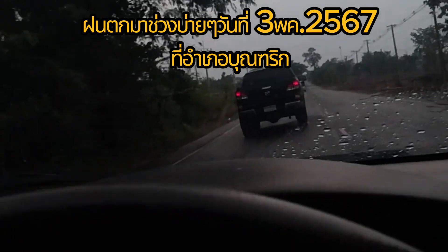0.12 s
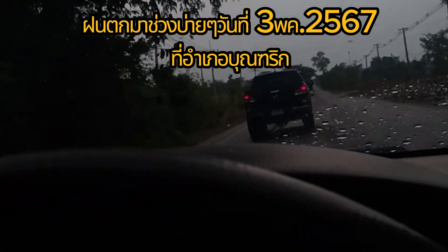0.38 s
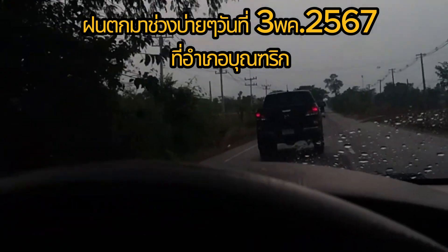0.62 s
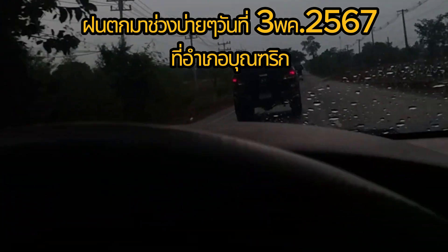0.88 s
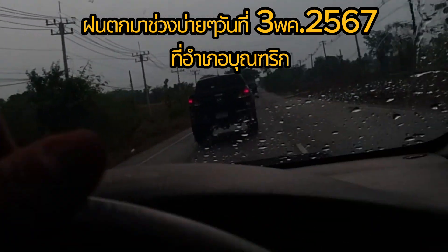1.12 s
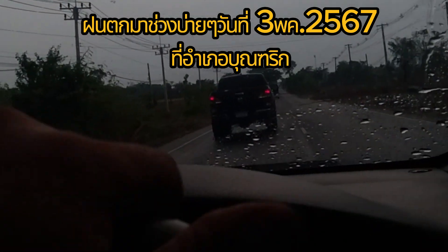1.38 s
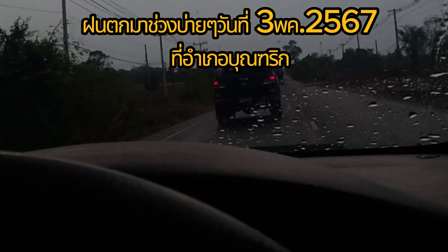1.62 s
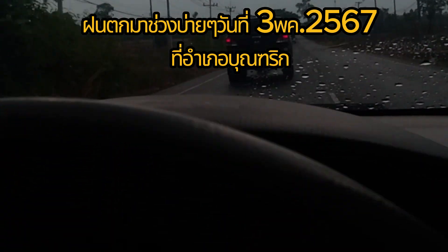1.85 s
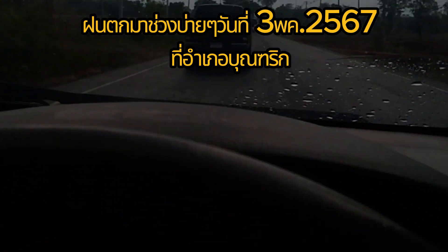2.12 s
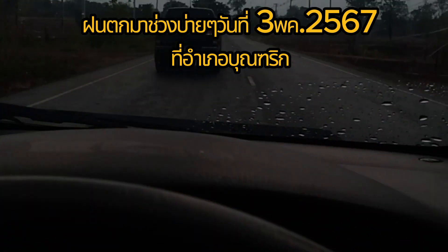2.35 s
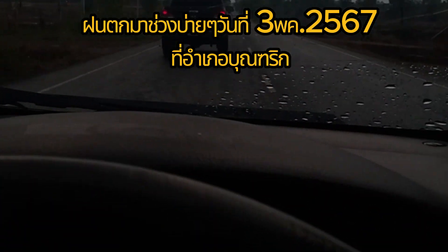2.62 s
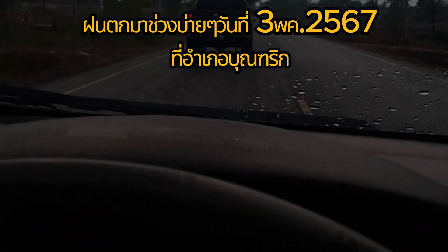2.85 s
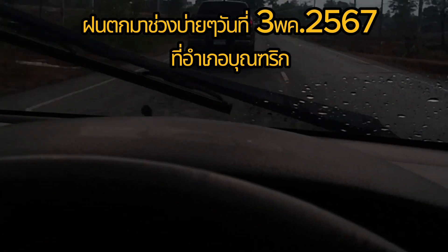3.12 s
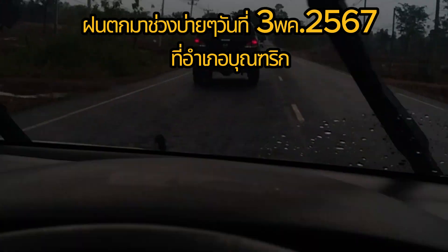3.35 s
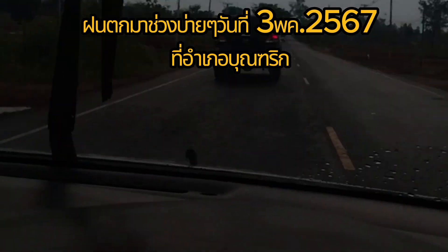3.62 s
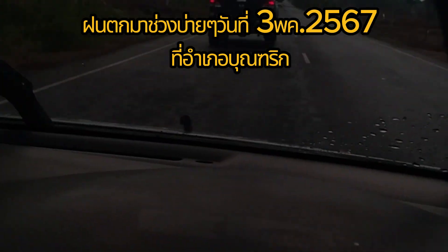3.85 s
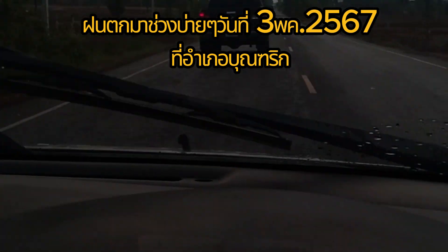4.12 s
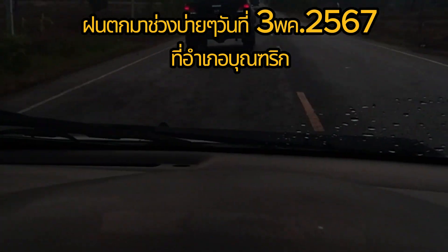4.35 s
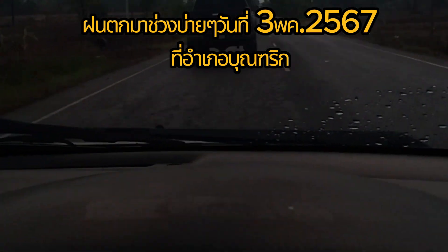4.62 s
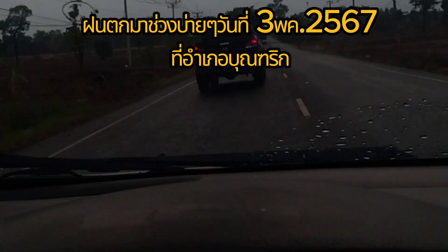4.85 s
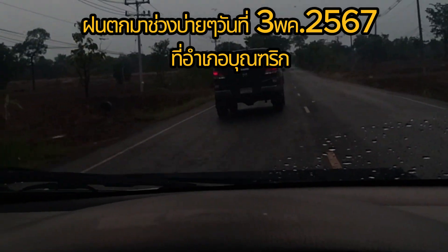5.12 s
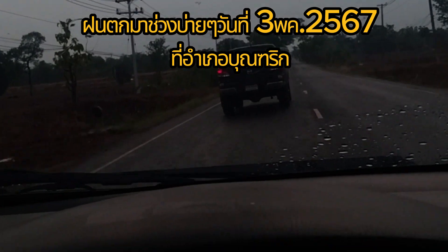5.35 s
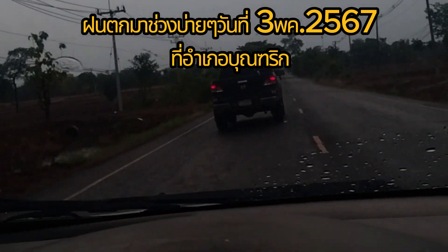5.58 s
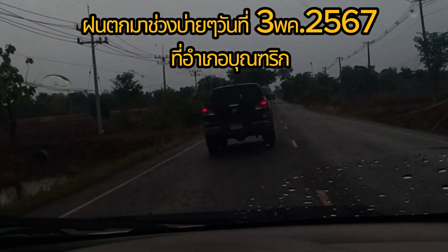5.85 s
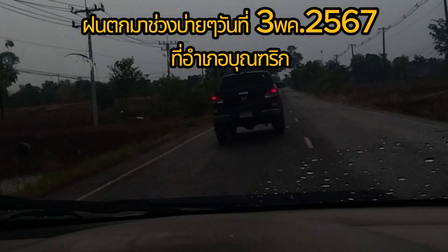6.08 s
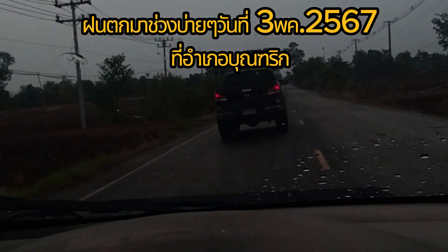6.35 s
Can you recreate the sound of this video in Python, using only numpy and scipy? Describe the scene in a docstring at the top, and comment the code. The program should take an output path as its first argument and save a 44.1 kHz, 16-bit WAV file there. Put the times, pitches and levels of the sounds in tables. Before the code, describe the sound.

Close inside a car cabin on a wet road, deep tyre rumble and a low engine hum run throughout. A few raindrops tap the glass, then thicken into a cluster past two seconds. Midway the wiper blade chatters with a faint squeak and low groan. Drops continue more densely while the engine eases and the rumble softens.

```python
"""Inside a car on a wet road: tyre rumble, a booming body and an engine that gains speed as its load eases off.
Scattered raindrops tap the windscreen and roof; the wiper blade chatters on its way down; the trim ticks.
Road is shaped noise, boom and engine are wavering sines, taps are ticks with noise tails filtered by the glass,
the wiper is a train of slips ringing its arm.
Two microphone ports hear the bass alike and the treble each in its own colour."""
import sys
import numpy as np
from scipy import signal
from scipy.fft import rfft, irfft, next_fast_len
from scipy.io import wavfile
from scipy.ndimage import uniform_filter1d

SR = 44100
rng = np.random.default_rng(int(sys.argv[2]) if len(sys.argv) > 2 else 0)


def volts_from_decibels(level):
    """Turn decibel levels (scalar or array-like) into linear amplitude factors."""
    exponent = np.asarray(level, float) / 20
    return 10 ** exponent


def output_pcm(signal):
    """Save a mono or channel-first signal as 16-bit PCM at the path in sys.argv[1].

    Samples are clipped to [-1, 1] before scaling.
    """
    pcm = np.clip(np.atleast_2d(signal).T, -1, 1) * 32767
    wavfile.write(sys.argv[1], SR, np.round(pcm).astype(np.int16))


N = 285371

# engine course: (time [s], firing rate [Hz], load [dB])
ENGINE_COURSE = [(0, 50.03, -22.5), (1.0, 52.18, -19), (1.7, 54.33, -20.5), (2.4, 55.92, -25),
                 (3.3, 56.93, -27), (3.55, 57.04, -27.5), (5.5, 57.28, -30.5), (6.47, 56.97, -37.5)]


def evened(x):
    """Scales to rms 1."""
    return x / np.sqrt(np.mean(x ** 2) + 1e-20)


def smooth(x, size, axis=-1):
    """Moving average."""
    return uniform_filter1d(x, size, axis=axis)


def wander(size):
    """Slow chance of rms 1, smooth over size samples."""
    return evened(smooth(smooth(rng.standard_normal(N), size), size))


def read(points, hz):
    """Reads a spectrum on a log-frequency axis."""
    f, value = np.transpose(points)
    return np.interp(np.log(hz + 1), np.log(f + 1), value)


def curves(rows, t):
    """Joins the rows of a table over the times t."""
    s, *columns = np.transpose(rows)
    return [np.interp(t, s, c) for c in columns]


def peaks_db(hz, centre_hz, width_hz, db):
    """A resonance as a bump in dB."""
    return db / (1 + ((hz - centre_hz) / (width_hz / 2)) ** 2)


def sides(db):
    """Left and right gains of a level difference."""
    return volts_from_decibels([[db / 2], [-db / 2]])


def add(mix, s, sound):
    """Mixes a sound in at time s."""
    part = mix[:, round(s * SR):][:, :sound.shape[1]]
    part += sound[:, :part.shape[1]]


def road():
    """Noise whose roar and hiss slowly thin out, with drifting patches and the cabin's dense modes."""
    # tyre and road noise in the cabin: (frequency [Hz], relative density [dB per Hz])
    spectrum = [(8.8, -37), (15, 1), (43, -1), (92, -7.5), (138, -8.5), (286, -19), (340, -19.5),
                (610, -27), (1460, -39.5), (2020, -40), (3900, -48), (4840, -53.5), (6480, -58),
                (7940, -66), (10000, -68.5), (16000, -97)]
    # cabin and tyre resonances: (frequency [Hz], width [Hz], under load [dB], coasting [dB])
    cavities = [(75.1, 2.5, -1, 2), (136.9, 4.65, 8.5, 19.5), (186, 14.7, 7, 7.5), (285.4, 43, 6.5, 3),
                (499.4, 33, 6.5, 3), (624, 39, 3, 6), (1035, 204, 0.5, 4), (1270, 230, 8, 3.5),
                (1974, 650, 4, 4.5), (2350, 360, 3, 3.5)]
    # left-right likeness: (frequency [Hz], correlation [-1..1])
    likeness = [(60, 0.96), (200, 1), (330, 0.51), (500, 0.31), (780, 0.66), (1200, 0.034), (15000, .05)]
    level_db, patches_db, drift_db, modes_db = -20.5, 1.0, 1.0, 1.7
    roar_fade_db_per_s, hiss_fade_db_per_s = 0.39, 0.61  # thin out as the car settles
    rumble_eases_s, rumble_fade_db_per_s = 5.3, 1.6  # a smoother stretch of road begins

    frames, hz = N // 2048 + 5, np.fft.rfftfreq(8192, 1 / SR)
    t = np.arange(frames) * 2048 / SR
    bins = hz[:, None]
    a, b, c, d, patches = rng.standard_normal((frames, len(hz), 5)).T
    patches = evened(smooth(smooth(patches, 60, 0), 3, 1))
    spray = evened(smooth(smooth(rng.standard_normal((len(hz), frames)), 250, 0), 12, 1))  # comes and goes
    modes = evened(smooth(rng.standard_normal((2, len(hz), 1)), 8, 1))

    fade_db_per_s = read([(150, 0.011), (700, roar_fade_db_per_s), (4000, hiss_fade_db_per_s)], bins)
    surface_db = -fade_db_per_s * (t - t.mean())
    surface_db -= read([(150, rumble_fade_db_per_s), (700, 0)], bins) * np.maximum(t - rumble_eases_s, 0)
    load = np.clip((curves(ENGINE_COURSE, t)[1] + 27) / 6, 0, 1)  # 0 coasting, 1 under load
    cavity_db = 0
    for f, width_hz, loaded_db, coasting_db in cavities:
        cavity_db += peaks_db(bins, f, width_hz, load * loaded_db + (1 - load) * coasting_db)

    same = np.clip(read(likeness, bins), -1, 1)
    left, other = a + 1j * b, c + 1j * d
    z = np.array([left, same * left + np.sqrt(1 - same ** 2) * other])
    colour_db = read(spectrum, bins) + cavity_db + surface_db + patches_db * patches
    colour_db = colour_db + drift_db * np.clip(bins / 2500, 0, 1) * spray
    colour_db = colour_db + modes_db * np.clip(bins / 600, 0, 1) * modes
    noise = signal.istft(z * volts_from_decibels(colour_db), nperseg=8192, noverlap=6144)[1][:, :N]
    return volts_from_decibels(level_db) * evened(noise)


def boom():
    """Two close modes of the shell on its springs, which beat, shaken by the bumps of the road."""
    # shell modes: (frequency [Hz], relative level [dB])
    shell = [(27.15, -1.5), (31.17, -2.5)]
    # how hard the road shakes the shell: (time [s], level [dB])
    shake = [(0, -28.5), (.3, -22), (.9, -26.5), (1.8, -25), (2.2, -14.5), (2.6, -18), (2.9, -29.5),
             (3.6, -20), (3.8, -19.5), (4.97, -18), (5.25, -27.5), (5.6, -21.5), (6.47, -22)]
    t = np.arange(N) / SR
    shake_db = curves(shake, t)[0]
    out = np.zeros(N)
    for hz, db in shell:
        level_db = db + shake_db + 1.0 * wander(9000)
        turns = hz * t + rng.random() + 0.19 * wander(9000)
        out += np.sqrt(2) * volts_from_decibels(level_db) * np.sin(2 * np.pi * turns)
    return out


def engine():
    """Orders of the firing rate; higher orders fade faster as the load falls, and each wavers."""
    # (order [multiple of the firing rate], relative level [dB])
    orders = [(1, 0), (2, -8), (3, -12), (3.5, -20.5), (4, -12.5), (5, -17.5), (7, -26), (10.4, -28)]
    hz, load_db = curves(ENGINE_COURSE, np.arange(N) / SR)
    firings = np.cumsum(hz) / SR
    out = np.zeros(N)
    for order, db in orders:
        fade_db = 0.14 * (order - 1) * (load_db - load_db.max())
        level_db = db + load_db + fade_db + 1.45 * wander(4000)
        turns = order * firings + rng.random() + 0.019 * wander(4000)
        out += volts_from_decibels(level_db) * np.sin(2 * np.pi * turns)
    return np.sqrt(2) * out


def knocks():
    """A plastic tick of the trim, and a bright ring set off by the spatter of drops just before 6 s: short
    rings of a few close modes, with a quick soft start."""
    # (time [s], frequency [Hz], level [dB], t60 [s], left minus right [dB])
    ticks = [(6.0672, 2140, -33, 0.012, 8), (5.9945, 6200, -37, 0.018, 13)]
    t, out = np.arange(2000) / SR, np.zeros((2, N))
    for s, hz, db, t60_s, pan_db in ticks:
        shape = (1 - np.exp(-t / 0.00086)) ** 2 * volts_from_decibels(-60 * t / t60_s)
        spread, phase = rng.random((2, 4, 1))
        side_hz = hz * (0.9 + 0.25 * spread)
        ring = np.sin(2 * np.pi * hz * t) + 0.4 * np.sin(2 * np.pi * (side_hz * t + phase)).sum(0)
        add(out, s, sides(pan_db) * volts_from_decibels(db) * shape / shape.max() * ring)
    return out


def wiper():
    """The rubber sticks and slips: each slip rings the arm, and the glass groans at twice the rate."""
    # modes of the arm: (factor on the squeak pitch [ratio], width [Hz], relative level [dB])
    arm = [(1, 400, 7), (1.07, 400, 0), (1.14, 380, -5)]
    stroke_s, length_s = 3.668, 0.47
    slips_per_s, slips_lost_per_s2 = 95, 46  # the blade slows on its way
    base_hz, rise_hz, settle_s = 4030, 120, 0.09
    squeak_db, sag_db_per_s, tail_db = -50, 7, -8  # it holds, then drops to a faint tail
    attack_s, hold_s, release_s = 0.035, 0.306, 0.03
    groan_db, groan_after_s, groan_width_s, groan_tail_db = -21, 0.065, 0.037, -34

    t = np.arange(N) / SR
    since = np.clip(t - stroke_s, 0, length_s)
    release = np.minimum((length_s - since) / release_s, 1)
    attack = np.minimum(since / attack_s, 1)
    fallen = np.clip((since - hold_s) / release_s, 0, 1)
    loud = attack * release * volts_from_decibels(squeak_db - sag_db_per_s * since + tail_db * fallen)

    rate = slips_per_s - slips_lost_per_s2 * since
    turns = np.cumsum(rate * (1 + 0.025 * wander(300))) / SR
    slips = np.diff(np.floor(turns), prepend=0) * volts_from_decibels(1.8 * rng.standard_normal(N))
    slips += 0.028 * rng.standard_normal(N)  # rubbing noise

    squeak_hz = base_hz + rise_hz * (1 - np.exp(-since / settle_s))
    u, squeak = t[:900], 0
    for factor, width_hz, db in arm:
        turn = np.exp(2j * np.pi * factor * np.cumsum(squeak_hz) / SR)  # the ring follows the gliding pitch
        decay = u * np.exp(-np.pi * width_hz * u) * width_hz
        squeak += volts_from_decibels(db) * (turn * signal.oaconvolve(slips / turn, decay)[:N]).real

    # a short swell early in the stroke over a faint arch that spans it
    swell = volts_from_decibels(groan_db) * np.exp(-((t - stroke_s - groan_after_s) / groan_width_s) ** 2)
    arch = volts_from_decibels(groan_tail_db) * np.sin(np.pi * since / length_s)
    groan = np.sqrt(2) * (swell + arch) * np.sin(2 * 2 * np.pi * turns)
    return evened(squeak) * loud * sides(8.4) + groan


def drop(db, dull_db, bright_db):
    """A tick, a few strong early reflections, then the cabin's short tail; the right port hears it first."""
    # what a drop sets ringing in the glass: (frequency [Hz], relative density [dB per Hz])
    glass = [(1000, -21.5), (1800, -8.5), (2500, -3), (3700, -2.5), (4900, -4), (6600, -9.5), (8000, -12.5),
             (9900, -15), (12600, -21), (16000, -21)]
    # the cabin's answer to a tap: (frequency [Hz], t60 [s])
    cabin = [(2000, 0.12), (5000, 0.11), (10000, 0.12), (15000, .08)]
    # treble swallowed by soft trim, applied at 0.5 rising to 1.5 times: (frequency [Hz], loss [dB])
    trim_loss = [(6000, 0.36), (10000, 5.4), (14000, 10)]
    tick_s, bend_lag_s = 0.0024, 0.0005  # lag: a 3.5 kHz wave in the glass behind the highest treble

    t = np.arange(6144) / SR
    spikes_db = 2.7 * rng.exponential(1, (2, len(t))) * np.exp(-t / 0.011)
    sparse = rng.standard_normal((2, len(t))) * volts_from_decibels(spikes_db)
    early = 1 + np.array([[0.3], [1.2]]) * np.exp(-t / 0.0026)
    burst = sparse * (1 - 0.95 * np.exp(-t / 0.0014)) * early
    burst[:, 0] = 6.5  # the direct tick
    burst[0] = np.roll(burst[0], 30) * (t >= 30 / SR)

    hz, frame_t, z = signal.stft(burst, SR, nperseg=128)
    decay_db = -60 * frame_t / read(cabin, hz)[:, None]
    decay_db -= read(trim_loss, hz)[:, None] * (1.5 - np.exp(-frame_t / tick_s))
    decayed = signal.istft(z * volts_from_decibels(decay_db), SR, nperseg=128)[1][:, :len(t)]

    hz = np.fft.rfftfreq(1024, 1 / SR)
    spot_db = 1.8 * evened(smooth(smooth(rng.standard_normal(len(hz)), 12), 12))  # each spot has its own modes
    tilt_db = read([(2600, dull_db), (5200, 0.013), (7000, 0.004), (9000, bright_db)], hz)
    colour_db = read(glass, hz) + spot_db + tilt_db
    log_gain = np.log(volts_from_decibels(np.r_[colour_db, colour_db[-2:0:-1]]))
    # bending waves: treble travels fastest
    lag_s = bend_lag_s * np.clip(np.sqrt(16000 / (hz + 500)) - 1, 0, None)
    lag = np.cumsum(lag_s) * 2 * np.pi * hz[1]
    # minimum phase plus the lag: nothing before the tick
    phase = -signal.hilbert(log_gain).imag - np.r_[lag, -lag[-2:0:-1]]
    ring = np.fft.ifft(np.exp(log_gain + 1j * phase)).real[:512]
    sound = signal.fftconvolve(decayed, ring[None], axes=1)
    return volts_from_decibels(db) * sound / np.sqrt(np.mean(sound[:, :400] ** 2))


def rain():
    """Large drops, spatters of several drops at once and a random scatter of small ones."""
    # (time [s], level of the first 9 ms [dB], dull part [dB], bright part [dB])
    large = [(0.065, -38.5, 10, 0), (0.356, -41, 2, -6), (1.1343, -35.5, 7, -6), (1.171, -35, 8, 0.5),
             (1.281, -40, 4.5, -1), (1.396, -38.5, 8.5, -2), (1.7836, -39.5, 5, 1), (1.7863, -28.5, 4.5, 3),
             (2.126, -41.5, 11, 2), (2.296, -28.5, 3.5, 1.5), (2.352, -30.5, 5.5, 0.5), (2.442, -35, 9, -8),
             (2.4985, -31.5, 7, -4.5), (2.5898, -31, 1, -1), (3.12, -47.5, -1, -1), (3.2044, -42, 4.5, -3),
             (3.4453, -40, 10, -1), (3.4816, -47.5, 2, 2), (3.7546, -37.5, -1, 3), (3.927, -36, 10, 3.5),
             (3.9984, -45, 3, -7.5), (4.1918, -30, 3.5, -3.5), (4.272, -32, 7, 0.5), (4.279, -29.5, 5, 5),
             (4.519, -38, 4.5, -0.5), (4.6402, -33.5, -1, 1), (4.7614, -44, 1, -4), (4.78, -37, 4, -6),
             (4.796, -31.5, 4, -7), (4.863, -32.5, 1.5, 1.5), (4.874, -43.5, 3, 4), (4.931, -32, 6.5, -0.5),
             (5.1632, -42, 4.5, -1.5), (5.2279, -40.5, 3.5, 0), (5.2596, -41.5, 1, -1),
             (5.291, -39.5, 2, -0.5), (5.359, -32.5, 4.5, 4), (5.4, -31, 8.5, -1.5), (5.459, -36.5, 5, -1),
             (5.4817, -32.5, 5, 0.5), (5.57, -37.5, 4, -1), (5.6103, -46, -1, -1), (5.7158, -42.5, 0, -0.5),
             (5.9232, -39.5, 7, -4), (6.015, -39.5, 8, -4), (6.195, -34.5, 4, 1), (6.349, -36, 5, 3.5),
             (6.369, -30.5, 2.5, 2.5), (6.431, -45, 0, -8), (6.46, -28.5, 12, -8.5)]
    # (time [s], length [s], level of a drop at the height of the swell [dB], dull part [dB], bright part [dB])
    spatters = [(3.743, .025, -43.5, 10, 3), (5.208, 0.035, -43.5, -2.5, -2), (5.244, .03, -48, 0.5, -1.5),
                (5.989, 0.013, -45, -14, -0.5)]
    count, drizzle_per_s, drizzle_db = 10, 26, -59
    out = np.zeros((2, N))
    for s, *blow in large:
        add(out, s, drop(*blow))
    for s, length_s, *blow in spatters:
        for k in range(count):
            swell = np.sin(np.pi * (k + 0.5) / count)
            add(out, s + length_s * (k + rng.random()) / count, swell * drop(*blow))
    for when, size, dull, bright in rng.random((round(drizzle_per_s * N / SR), 4)):
        small_db = drizzle_db - 2.5 * np.log(size + 0.03)
        add(out, when * N / SR, drop(small_db, 6 * dull, -6 * bright))
    return out


def scene():
    """All sources in the cabin."""
    return road() + boom() + engine() + knocks() + wiper() + rain()


def low_pass(x):
    """Removes everything above the highest recorded frequency."""
    return signal.sosfilt(signal.butter(12, 16300, fs=SR, output="sos"), x)


def record(dry):
    """Each port colours the sound its own way and adds its own flat hiss."""
    # the ports' own colour: (frequency [Hz], left minus right [dB])
    ports = [(60, 0), (150, -2), (400, 0), (1100, 0.5), (2500, 6), (4500, 3.5), (6500, 11.5), (7800, 5),
             (9700, -21), (11500, -11), (14000, 0)]
    # port resonances: (frequency [Hz], width [Hz], height [dB])
    port_peaks = [(6590, 1180, 7), (10050, 1340, 6.5)]
    hiss_db = -77
    size = next_fast_len(N + SR)
    fade_in = np.minimum(np.arange(N) / 200, 1)  # a soft start, without a click
    hz = np.fft.rfftfreq(size, 1 / SR)
    left_share = 1 / (1 + volts_from_decibels(-read(ports, hz)) ** 2)  # of the power
    balance = np.sqrt(2 * np.array([left_share, 1 - left_share]))
    colour = volts_from_decibels(sum(peaks_db(hz, *peak) for peak in port_peaks)) * balance
    ported = irfft(rfft(dry * fade_in, size) * colour, size)[:, :N]
    ported += volts_from_decibels(hiss_db) * rng.standard_normal((2, N))
    return low_pass(ported)


dry = scene()
out = record(dry)
output_pcm(out)
```